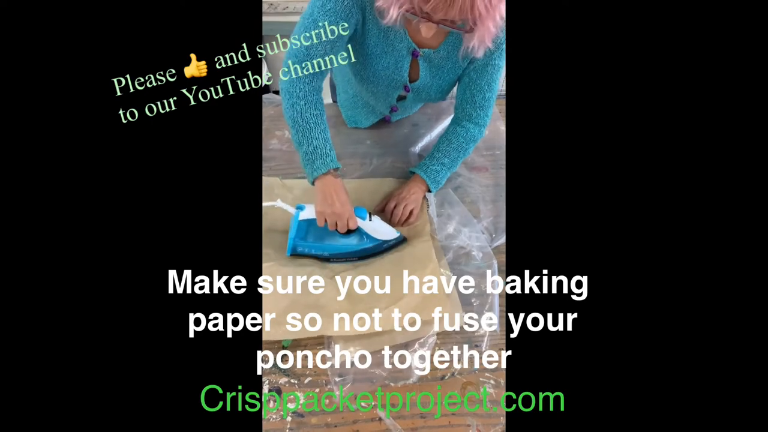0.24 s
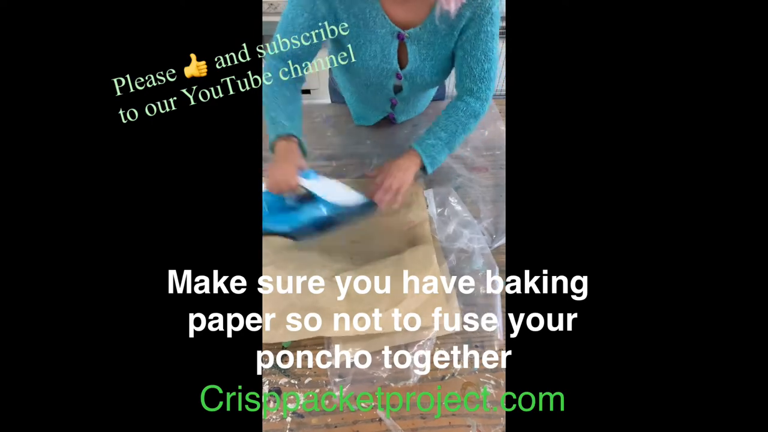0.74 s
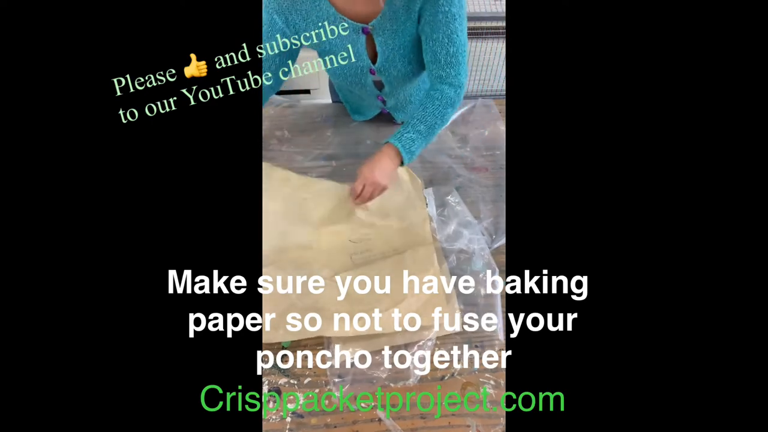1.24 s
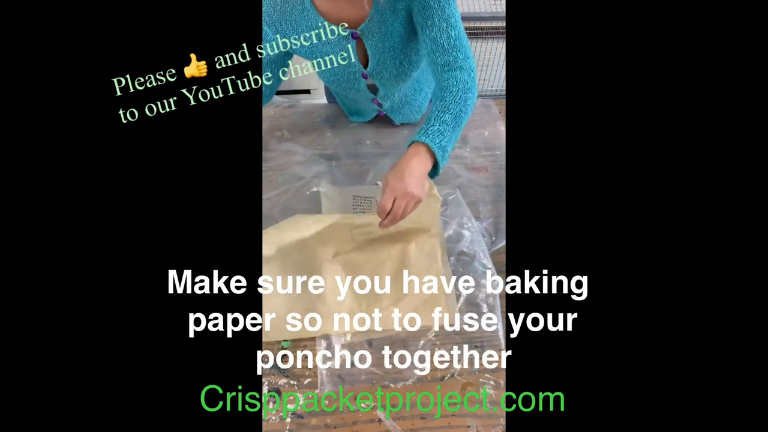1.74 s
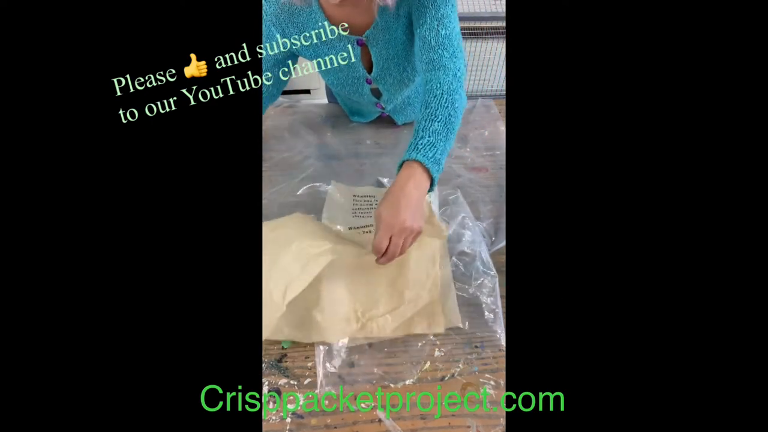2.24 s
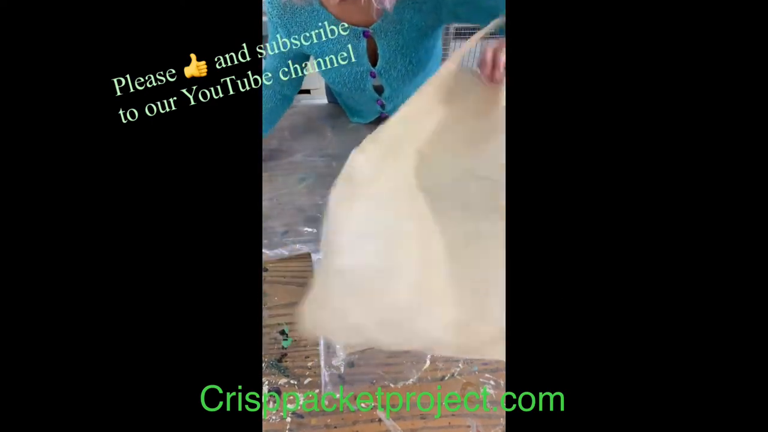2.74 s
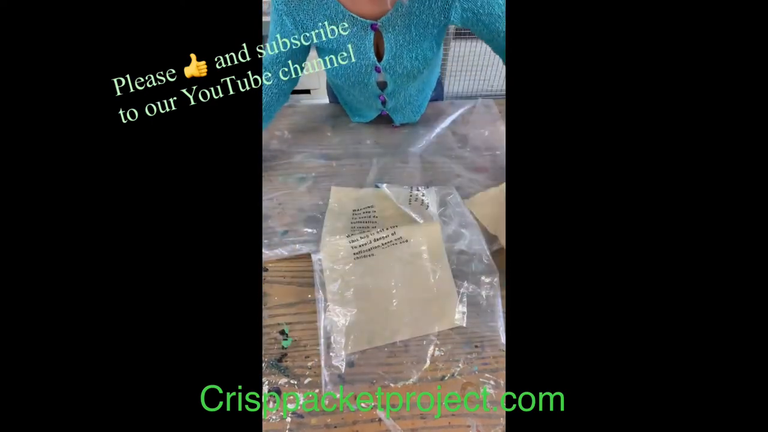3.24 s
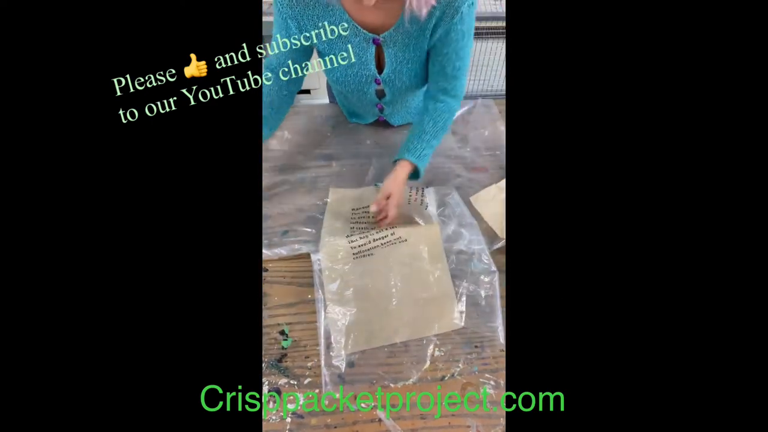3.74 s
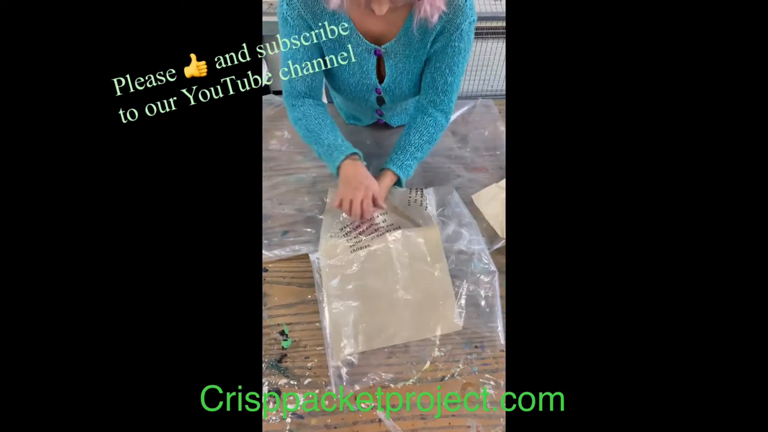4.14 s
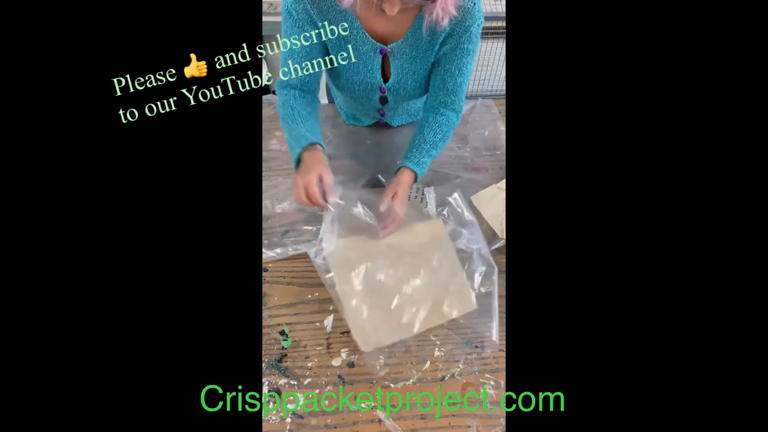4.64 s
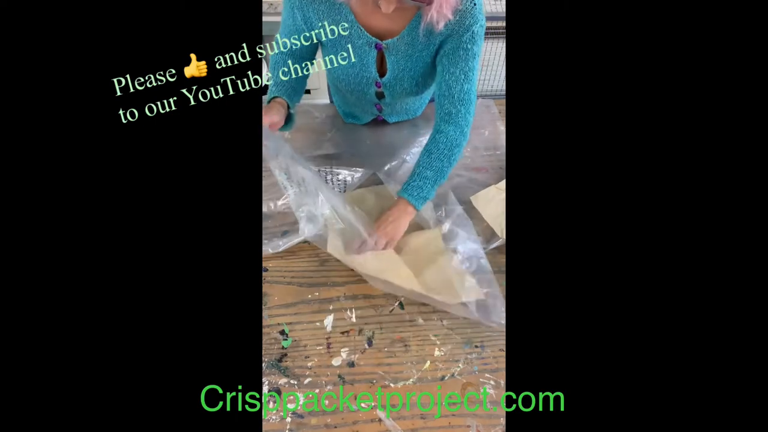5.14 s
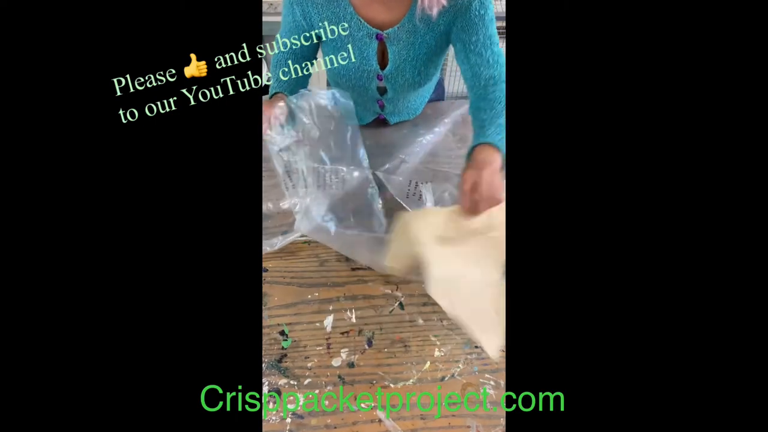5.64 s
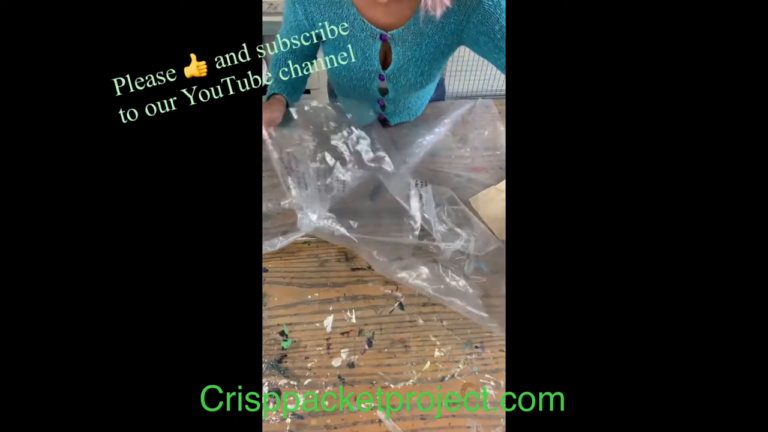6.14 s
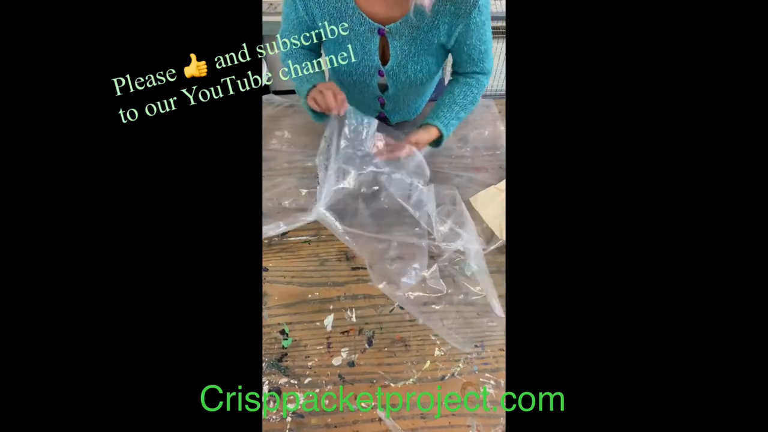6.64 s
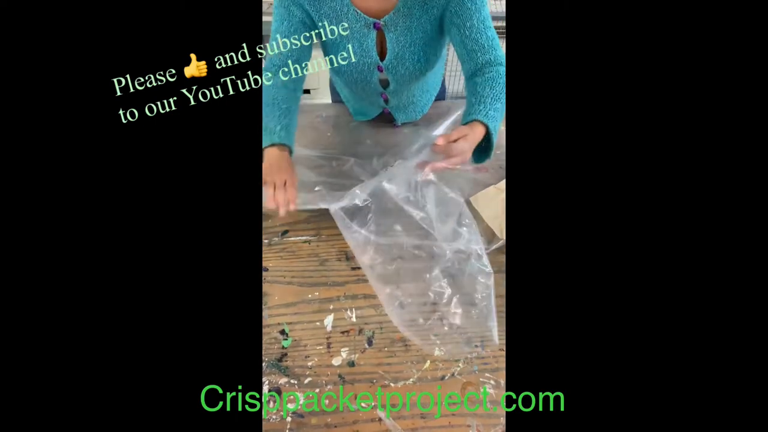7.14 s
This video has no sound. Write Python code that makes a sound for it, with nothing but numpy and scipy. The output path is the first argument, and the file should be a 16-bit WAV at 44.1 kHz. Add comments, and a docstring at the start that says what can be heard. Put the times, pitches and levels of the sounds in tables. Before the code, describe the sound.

Baking paper crackles close to the microphone under an iron, with a sharp cluster of snaps at the start and softer crinkling until about 1 second. The paper then slides off a plastic bag in a hissing rustle until 2.5 seconds. Over this, between 1.4 and 1.8 seconds, the iron is set down on a wooden table with three thuds and short plastic clacks. From 2.5 to 3.7 seconds the lifted paper crackles crisply in the air. Fingers part the plastic bag with quieter crinkles and little pops until 4.9 seconds. Paper is pulled out of it in a louder rustle, peaking around 5.5 seconds with a soft bump. The bag is shaken with bright snaps, then smoothed from 6.7 seconds to the end at 7.4 with duller crinkles and pops. A faint appliance hum and low air rumble lie underneath in the small room.

```python
"""Baking paper crackles under an iron, close up, then is drawn off a plastic bag and lifted away.
The iron is set down on the wooden table with three thuds; the bag is opened, shaken out and smoothed.
Both sheets sound by buckling: swarms of tiny snaps over a sliding hiss, with loud creases popping through.
Behind them a small room hums faintly. A microphone with two closely spaced ports hears it all."""
import sys
import numpy as np
from scipy import signal
from scipy.fft import rfft, irfft, next_fast_len
from scipy.io import wavfile
from scipy.ndimage import uniform_filter1d, map_coordinates

SR = 44100
rng = np.random.default_rng(int(sys.argv[2]) if len(sys.argv) > 2 else 0)


def store_wav(level_fs):
    """Save 16-bit WAV to argv[1]."""
    pcm = np.round(np.clip(np.atleast_2d(level_fs), -1, 1) * 32767)
    wavfile.write(sys.argv[1], SR, pcm.T.astype(np.int16))


N = 326340

# The paper's colour at close range in each gesture: frequency_hz, relative_db
PAPER_IRONED = [(70, -22), (250, -7), (450, -10), (700, -3), (1050, 1), (1450, -1), (2300, -9), (3200, -10),
                (6000, -10), (9500, -14), (15000, -19)]
PAPER_DRAWN = [(70, -22), (250, -7), (450, -2), (700, -2), (1000, -1.5), (1450, 0.5), (2100, -2),
               (3200, -2.5), (6000, -7), (9500, -9), (15000, -15)]
PAPER_DRAGGED = [(70, -20), (250, -2), (450, 0), (700, 0), (1000, -1), (1450, 0), (2100, -5), (3200, -6),
                 (6000, -8), (9500, -8.5), (15000, -12.5)]
PAPER_LIFTED = [(70, -22), (250, -3), (450, -3), (700, -4), (1000, -3), (1450, -2), (2100, -3), (3200, -6),
                (6000, -8), (9500, -9), (15000, -11)]
def baking_paper():
    """Just in front of the microphone, paper shifts under the iron, slides off and crackles in the air."""
    sliding = dict(snaps_per_s=2800, spread_db=1.5, clump_db=1.5, hiss=0.45,
                   flex_db=1.5, jerk_db=.7, fold_db=2)
    return (rustle("ironing", PAPER_IRONED, snaps_per_s=1400, spread_db=6, clump_db=0.5, hiss=0.45,
                   flex_db=0.5, tick_db=-0.5, jerk_db=.7, fold_db=3)
            + rustle("drawing", PAPER_DRAWN, tick_db=0.6, **sliding)
            + rustle("dragging", PAPER_DRAGGED, tick_db=0.8, **sliding)
            + rustle("lifting", PAPER_LIFTED, snaps_per_s=900, spread_db=5.5, clump_db=3, hiss=0.26,
                     flex_db=0, tick_db=-0.8, jerk_db=.8, fold_db=3.5))


# The bag's colour, bright hanging free and dull under the palms: frequency_hz, relative_db
BAG_OPENED = [(70, -22), (250, -5), (450, -3), (700, 0), (1000, -1), (1450, 0), (2100, -5), (3200, -7),
              (6000, -11), (9500, -15), (15000, -23)]
BAG_EMPTIED = [(70, -22), (250, -9), (450, -5), (700, -1), (1000, -1), (1450, 0), (2100, -3), (3200, -5),
               (6000, -8), (9500, -9), (15000, -15)]
BAG_SHAKEN = [(70, -22), (250, -3), (450, -3), (700, -1), (1000, -1), (1450, 0), (2100, -2), (3200, -4),
              (6000, -5), (9500, -5), (15000, -12)]
BAG_SMOOTHED = [(70, -22), (250, -4), (450, -2), (700, -3), (1000, -2), (1450, 0), (2100, -5.5),
                (3200, -9.5), (6000, -15), (9500, -19), (15000, -28)]
def plastic_bag():
    """At the same spot, fingers part the bag, pull the inner paper out, shake the film and press it flat."""
    return (rustle("opening", BAG_OPENED, snaps_per_s=700, spread_db=5, clump_db=4, hiss=0.4,
                   flex_db=-0.3, tick_db=-0.3, jerk_db=.8, fold_db=4)
            + rustle("emptying", BAG_EMPTIED, snaps_per_s=800, spread_db=4, clump_db=3.5, hiss=0.28,
                     flex_db=-0.6, tick_db=-0.3, jerk_db=.7, fold_db=3.5)
            + rustle("shaking", BAG_SHAKEN, snaps_per_s=1300, spread_db=5.5, clump_db=1.5, hiss=0.35,
                     flex_db=-1, tick_db=0, jerk_db=.7, fold_db=3)
            + rustle("smoothing", BAG_SMOOTHED, snaps_per_s=1200, spread_db=4, clump_db=2.5, hiss=0.35,
                     flex_db=0, tick_db=-3, jerk_db=.8, fold_db=4))


SPLIT_HZ = 3800  # a sheet flexes below this and ticks above it
# What the hands are doing, by gesture name: start_s, end_s
GESTURES = {"ironing": (0, 1.03), "drawing": (1.03, 2.05), "dragging": (2.05, 2.53),
            "lifting": (2.53, 3.75), "opening": (3.75, 4.88), "emptying": (4.88, 5.68),
            "shaking": (5.68, 6.7), "smoothing": (6.7, 7.4)}
# Each push or pull on a sheet: peak_s, rise_s, hold_s, flex_db, tick_over_flex_db
HAND_STROKES = [(0.006, 0.095, .02, -54, -14), (0.111, 0.11, 0.0061, -42, -1.5),
                (0.208, 0.038, 0.06, -53, -3), (0.388, 0.079, 0.018, -44, -1.5),
                (0.49, 0.049, 0.037, -53, -5), (0.64, 0.027, 0.073, -53.5, -7),
                (0.953, 0.024, 0.022, -57, -21), (1.086, 0.064, 0.047, -56, 3.5),
                (1.264, 0.14, 0.2, -37, -0.5), (1.314, .04, 0.017, -40.5, -4),
                (1.39, 0.064, 0.14, -43.5, -2.5), (1.522, 0.078, 0.25, -44.5, -0.5),
                (1.841, 0.016, 0.023, -50.5, 2.5), (2.136, 0.086, 0.041, -43.5, 0),
                (2.24, 0.15, 0.067, -44, 1), (2.386, 0.066, 0.024, -61, 5.5), (2.457, .05, 0.17, -66, -26),
                (2.628, 0.067, 0.012, -43, -4), (2.664, .015, 0.017, -44.5, -1),
                (2.723, 0.021, 0.015, -46, -3), (2.846, 0.069, 0.063, -52.5, -1.5),
                (2.982, 0.025, 0.043, -45, -1), (3.08, 0.022, 0.011, -54.5, 5),
                (3.191, 0.056, 0.017, -51.5, -0.5), (3.287, 0.051, 0.073, -49, -0.5),
                (3.411, 0.077, 0.16, -52, 0.5), (3.418, 0.036, 0.0097, -54, 9.5),
                (3.664, 0.042, 0.0089, -51.5, -8.5), (3.783, 0.097, 0.038, -53.5, -12),
                (3.858, 0.09, 0.065, -51, -2), (4.15, 0.14, 0.13, -56.5, -4),
                (4.472, 0.16, 0.023, -61.5, -8), (4.526, 0.025, 0.15, -51, -7.5),
                (4.695, 0.044, 0.021, -44, -4), (4.78, .04, 0.17, -56.5, -3),
                (4.923, 0.042, 0.15, -42, -4.5), (5.102, 0.05, 0.083, -45.5, -1),
                (5.196, 0.11, 0.037, -35.5, -2.5), (5.344, 0.19, 0.032, -42.5, 3.5),
                (5.41, .06, 0.035, -49, 2), (5.464, 0.067, 0.051, -35.5, -1.5),
                (5.602, 0.18, 0.021, -34.5, -2), (5.706, .05, 0.16, -48, -1),
                (5.874, 0.037, 0.13, -43.5, -3), (6.25, 0.1, 0.038, -60, 4),
                (6.304, 0.047, 0.021, -53, 6.5), (6.428, 0.13, 0.027, -53, 1),
                (6.519, 0.12, 0.051, -56.5, 8.5), (6.606, 0.066, 0.042, -54, -1.5),
                (6.731, 0.01, 0.039, -47.5, -5), (6.797, 0.06, 0.022, -43.5, -6.5),
                (6.871, 0.044, 0.097, -44, -5.5), (7.032, 0.012, 0.024, -47, -6.5),
                (7.257, 0.081, 0.089, -53.5, -7), (7.352, 0.045, 0.01, -49, -1)]
# The rustle's top treble is softened above 10 kHz: frequency_hz, gain_db
TREBLE_ROLLOFF = [(10000, 0), (16000, -4.5)]
def rustle(gesture, colour, snaps_per_s, spread_db, clump_db, hiss, flex_db, tick_db, jerk_db, fold_db):
    """A handled sheet buckles in clumps of tiny snaps; each flexes the sheet and ticks in the treble."""
    start, end = GESTURES[gesture]
    overlap_s = .25  # one gesture rings on into the next
    t = np.arange(round(max(start - overlap_s, 0) * SR), round((end + overlap_s) * SR)) / SR
    size = len(t)
    flex, tick = effort([row for row in HAND_STROKES if start <= row[0] < end], t)
    strength = amp(spread_db * np.minimum(rng.standard_normal(size), 2) + clump_db * wobble(109.2, size))
    snaps = (rng.random(size) < snaps_per_s / SR) * strength ** 2
    # the lower power makes ticks more even in size than the flexing
    flexing = amp(flex_db) * flex * swarm(snaps ** 0.87, life_s=0.002, hiss=hiss)
    ticking = amp(tick_db) * tick * swarm(snaps ** 0.75, life_s=0.00047, hiss=hiss)
    sheet = coloured(flexing, band(colour, -1.27))
    sheet += coloured(ticking, lambda hz: band(colour, 1)(hz) + along(TREBLE_ROLLOFF, hz))
    jerks = amp(jerk_db * wobble(39, size))  # the sheet gives way unevenly
    out = np.zeros(N)
    add(out, t[0], jerks * folding(sheet, fold_db))
    return out


def effort(strokes, t, rise_db=20, sag_db_per_s=23.5, release_db_per_s=173):
    """Flexing and ticking gains at times t: each stroke swells, sags while held and settles."""
    flex_power, tick_power = np.zeros((2, len(t)))
    for peak_s, rise_s, hold_s, flex_db, tick_over_flex_db in strokes:
        age = t - peak_s
        shape_db = (rise_db * np.minimum(age, 0) / rise_s
                    - sag_db_per_s * np.clip(age, 0, hold_s)
                    - release_db_per_s * np.maximum(age - hold_s, 0))
        flex_power += amp(flex_db + shape_db) ** 2
        tick_power += amp(flex_db + tick_over_flex_db + 1.37 * shape_db) ** 2  # swells and dies faster
    return np.sqrt(flex_power), np.sqrt(tick_power)


def swarm(snaps, life_s, hiss):
    """Each snap's energy dies away over life_s; sliding adds an even share of hiss."""
    energy = signal.lfilter([1], [1, -np.exp(-1 / (life_s * SR))], snaps)
    energy /= np.abs(uniform_filter1d(energy, size=SR // 32)) + 1e-9
    return np.sqrt(hiss + (1 - hiss) * energy) * rng.standard_normal(len(snaps))


def folding(x, depth_db):
    """Facets of the sheet grow and shrink, so its upper resonances come and go."""
    hz, _, spectrum = signal.stft(x, SR, nperseg=512)
    facets = uniform_filter1d(rng.standard_normal(spectrum.shape), size=5, axis=0)
    facets = uniform_filter1d(facets, size=5, axis=1)
    swing_db = depth_db * hz[:, None] / (hz[:, None] + SPLIT_HZ / 2)
    return signal.istft(spectrum * amp(swing_db * unit(facets)), nperseg=512)[1][:len(x)]


def band(colour, side):
    """A colour's flexing part (side < 0) or ticking part (side > 0); a larger side cuts more steeply."""
    return lambda hz: along(colour, hz) - 10 * np.log10(1 + ((hz + 100) / SPLIT_HZ) ** (-6 * side))


# Single creases that stand out of the rustle: start_s, tick_db, flex_db
LOUD_CREASES = [(0.0345, -51, -42.5), (0.109, -41, -37.5), (0.123, -40, -40), (0.1438, -37.5, -44),
                (0.2719, -61, -60), (0.3175, -68, -53), (0.454, -57, -47.5), (0.4744, -69, -48),
                (0.5393, -54.5, -57), (0.6595, -56, -53), (0.6793, -53, -65), (0.784, -62, -59),
                (1.0373, -48.5, -52.5), (1.0456, -47.5, -54), (1.085, -41, -44), (1.1269, -51, -47),
                (1.229, -36.5, -38), (1.332, -32, -32), (1.5974, -49, -43), (1.6205, -42, -44),
                (1.651, -42.5, -44), (1.6647, -43, -39.5), (1.6824, -44, -42), (1.6896, -43, -38),
                (1.772, -46, -41), (1.8275, -45, -50), (1.8523, -46, -46), (1.881, -45, -42),
                (2.006, -53, -47.5), (2.449, -71, -55.5), (2.533, -72, -59), (2.5567, -50.5, -52),
                (2.5997, -41, -45), (2.6438, -36.5, -36.5), (2.7417, -47, -44), (2.763, -43.5, -59),
                (2.7772, -56, -53), (2.835, -43, -47), (2.864, -38, -44), (2.9088, -50, -45),
                (2.9734, -39, -55), (2.994, -41, -47), (3.034, -32.5, -43), (3.058, -37, -46.5),
                (3.0895, -48, -47.5), (3.1428, -41.5, -56), (3.166, -51.5, -58), (3.187, -54, -67),
                (3.252, -47, -50), (3.426, -37, -49), (3.4931, -52, -51), (3.5296, -42.5, -54),
                (3.5818, -59, -47), (3.8177, -58, -50.5), (3.859, -49, -42), (3.867, -47, -41.5),
                (3.918, -46.5, -64), (3.926, -52, -46.5), (4.1634, -52, -48.5), (4.198, -45.5, -51),
                (4.2171, -49, -46), (4.2649, -60, -48), (4.288, -64, -47.5), (4.3093, -74, -57),
                (4.446, -62, -54), (4.514, -62, -48.5), (4.557, -67, -54), (4.5952, -54, -51),
                (4.6873, -45, -43), (4.8098, -42.5, -41.5), (4.862, -45.5, -46), (4.9198, -54, -36.5),
                (4.9294, -45, -39), (4.9482, -46, -45), (5.041, -36.5, -42), (5.049, -38.5, -62),
                (5.1, -37, -38), (5.1138, -46, -45), (5.221, -38, -37), (5.2835, -46, -41),
                (5.3364, -40, -41), (5.4012, -39, -36.5), (5.488, -46, -30), (5.507, -48, -39),
                (5.515, -47, -31), (5.575, -50, -29), (5.643, -32, -39), (5.691, -38, -50),
                (5.73, -48, -37.5), (5.8001, -38, -42.5), (5.833, -40.5, -54), (6.113, -50.5, -54),
                (6.2223, -47.5, -55.5), (6.271, -39, -60), (6.3224, -42, -47.5), (6.356, -58, -47),
                (6.607, -44, -54), (6.614, -56, -50.5), (6.7349, -48, -39), (6.7641, -47, -36.5),
                (6.77, -58, -43), (6.848, -45, -39.5), (6.9071, -48, -38), (6.9173, -50, -50),
                (6.9307, -57, -51), (6.9627, -52, -46), (7.099, -51, -50), (7.2366, -61, -48.5),
                (7.2423, -66, -52), (7.2906, -55, -50), (7.3112, -58, -47), (7.3462, -51, -46),
                (7.3543, -54, -53)]
# Gestures in which the sheet is loose enough to throw lesser creases: gesture_name
LOOSE_GESTURES = ["ironing", "lifting", "opening", "shaking"]
def creases(stray_slots=60, stray_db=-12, spread_db=2):
    """The loud single snaps of both sheets, and lesser ones at random that follow the hand's effort."""
    times = (np.arange(stray_slots) + rng.random(stray_slots)) / stray_slots * N / SR
    scatter = amp(stray_db + spread_db * rng.standard_normal((stray_slots, 2))).T
    flexes, ticks = effort(HAND_STROKES, times) * scatter
    loose_spans = [GESTURES[name] for name in LOOSE_GESTURES]
    lesser = [(start_s, tick, flex) for start_s, tick, flex in zip(times, ticks, flexes)
              if any(begin <= start_s < end for begin, end in loose_spans)]
    loud = [(start_s, amp(tick_db), amp(flex_db)) for start_s, tick_db, flex_db in LOUD_CREASES]
    out = np.zeros(N)
    for start_s, tick, flex in loud + lesser:
        add(out, start_s, tick * crease_flip(side=1, life_s=.0007, ring_db=-10, ring_s=.002))
        add(out, start_s, flex * crease_flip(side=-1, life_s=.0016, ring_db=-8, ring_s=.003))
    return out


# A crease's colour at close range: frequency_hz, relative_db
CREASE_COLOUR = [(70, -28), (300, -11), (700, -4), (1450, 0), (2200, -3), (3200, -5), (6000, -4),
                 (8500, -1), (16000, -5.5)]
def crease_flip(side, life_s, ring_db, ring_s):
    """A crease flips at once and the sheet around it shivers briefly."""
    t = np.arange(SR // 40) / SR
    envelope = np.exp(-t / life_s) + amp(ring_db) * np.exp(-t / ring_s)
    burst = envelope * rng.choice([-1, 1], len(t))
    return unit_burst(coloured(burst, band(CREASE_COLOUR, side)))


# Folds giving way: start_s, length_s, level_db
FOLD_RUNS = [(0.051, 0.0024, -48), (0.116, .012, -53), (0.286, .006, -70), (0.45, .005, -50),
             (0.65, .003, -63), (2.627, .006, -40), (2.645, 0.0025, -34), (2.653, .001, -41),
             (2.967, 0.0038, -44), (2.982, 0.0044, -38.5), (3.011, .007, -49), (3.032, .003, -54),
             (3.048, .002, -44), (3.097, .007, -54), (4.138, .004, -68), (4.244, 0.0026, -51),
             (4.452, 0.0032, -72), (4.927, .004, -47), (5.11, .005, -47), (5.159, 0.011, -36.5),
             (5.279, .004, -47), (5.35, 0.011, -36.5), (5.456, 0.0028, -40), (5.636, 0.0047, -34),
             (5.724, .008, -40.5), (5.806, 0.0029, -44), (5.869, 0.0015, -40), (5.878, .005, -42),
             (5.888, 0.0043, -35.5), (5.897, .006, -33), (5.926, .006, -40), (5.942, .009, -33),
             (6.012, 0.0038, -41), (6.31, 0.0044, -44)]
def fold_runs(count=6, spread_db=1.5, life_s=.0005):
    """A handful of bright, unevenly spaced snaps runs along one fold."""
    out, t = np.zeros(N), np.arange(SR // 40) / SR
    for start_s, length_s, level_db in FOLD_RUNS:
        onsets = (np.arange(count) + rng.random(count)) / count * length_s
        age = t - onsets[:, None]
        snaps = np.exp(-np.abs(age) / life_s) * (age >= 0)
        envelope = amp(spread_db * rng.standard_normal(count)) @ snaps
        run = coloured(envelope * rng.choice([-1, 1], len(t)), band(CREASE_COLOUR, 1))
        add(out, start_s, amp(level_db) * unit_burst(run))
    return out


# A sheet pops over under a fingertip: start_s, level_db, pitch_hz
FINGER_POPS = [(0.109, -37.5, 1155), (0.2095, -50.5, 1210), (5.51, -31.5, 1300), (4.1015, -54.5, 1420),
               (4.156, -55, 1440), (4.198, -56, 1170), (4.225, -44.5, 1380), (4.2643, -42.5, 1390),
               (4.288, -46.5, 1680), (4.405, -57, 1490), (4.4494, -68, 1210), (6.7345, -43, 2440),
               (6.7452, -51, 1340), (6.8052, -38.5, 1510), (6.849, -42, 1490), (6.871, -39, 1220),
               (6.8964, -40, 800), (6.9216, -42, 1510), (6.9284, -43, 1480), (6.9634, -42, 1200),
               (7.053, -50, 745)]
# Modes of the popped dome: pitch_ratio, relative_db
DOME_MODES = [(1, 0), (1.42, -5), (2.1, -11)]
def finger_pops(t60_s=.019, attack_s=.0011):
    """A small dome of film flips and rings in a few quickly damped modes."""
    out, t = np.zeros(N), np.arange(SR // 30) / SR
    for start_s, level_db, pitch_hz in FINGER_POPS:
        ring = np.zeros(len(t))
        for ratio, mode_db in DOME_MODES:
            mode_hz = pitch_hz * ratio * (1 + 0.067 * rng.standard_normal())
            decay = amp(mode_db - 60 * t * ratio / t60_s)
            ring += decay * np.sin(2 * np.pi * (mode_hz * t + rng.random()))
        ring *= 1 - np.exp(-t / attack_s)
        add(out, start_s, amp(level_db) * unit_burst(ring))
    return out


# The iron lands and rocks, the lifted paper flaps, hands bump the table: start_s, force_db, cutoff_hz
THUMPS = [(0.773, -45.5, 85), (1.367, -24, 150), (1.429, -24, 70), (1.514, -28, 190), (1.743, -20, 613),
          (1.774, -37.5, 710), (2.822, -42, 350), (2.889, -56, 306), (3.851, -51, 390), (5.546, -37.5, 149)]
# Low modes of the wooden table, plus the long, faint ring of the iron's soleplate:
# pitch_hz, relative_db, t60_s
WOOD_AND_SOLEPLATE_MODES = [(58, -7, 0.65), (89.3, -5.5, 0.32), (106.6, -7.5, 0.25), (135, -0.9, 0.34),
                            (182.4, -13, 0.75), (202.4, -8, 0.63), (236, 2, 0.1), (356, -2.5, 0.2),
                            (396, -10.5, 0.29), (440, -3, 0.24), (514, -7, 0.18), (647, -14, 0.11),
                            (996, -27.5, 5), (1090, -39, 4.2)]
# Colour of the thud beneath the modes: frequency_hz, relative_db
THUD_COLOUR = [(30, -24), (55, -5), (95, 1.5), (150, -6), (210, -11), (290, -15.5), (430, -16.5),
               (600, -20.5), (1200, -7), (4000, -24)]
# How long the thud lasts: frequency_hz, t60_s
THUD_DECAY = [(60, 0.43), (130, 0.89), (220, 0.75), (500, 0.98), (2000, 0.62)]
def low_thumps():
    """Each thump is a dense thud under wood and soleplate modes; a soft contact leaves only the low ones."""
    out, t = np.zeros(N), np.arange(SR) / SR
    for start_s, force_db, cutoff_hz in THUMPS:
        blow = np.zeros(len(t))
        for k, (pitch_hz, mode_db, t60_s) in enumerate(WOOD_AND_SOLEPLATE_MODES):
            swell = 1 - np.exp(-t * pitch_hz / 1.05)  # low modes take longer to build up
            decay = amp(mode_db - 3.5 + rng.normal(0, 1) - 60 * t / t60_s)
            blow += (-1) ** k * decay * swell * np.sin(2 * np.pi * pitch_hz * t)
        thud = coloured(dying_noise(THUD_DECAY), lambda hz: along(THUD_COLOUR, hz))
        add(blow, 0, amp(-7.5) * thud)
        add(out, start_s, amp(force_db) * filtered(blow, lambda hz: 1 / (1 + 1j * hz / cutoff_hz)))
    return out


# The iron tips onto its heel: start_s, level_db
IRON_CLACKS = [(1.3688, -32), (1.3958, -32.5), (1.516, -36), (1.773, -35)]
# Colour of its housing: frequency_hz, relative_db
HOUSING_COLOUR = [(150, -20), (400, -9), (750, 2), (1000, 4), (1400, -2), (2000, -11), (3000, -15),
                  (6000, -15), (16000, -40)]
def iron_clacks(t60_s=0.025):
    """The iron's plastic housing gives a short, hard rattle."""
    out, t = np.zeros(N), np.arange(SR // 20) / SR
    for start_s, level_db in IRON_CLACKS:
        rattle = rng.standard_normal(len(t)) * amp(-60 * t / t60_s)
        clack = coloured(rattle, lambda hz: along(HOUSING_COLOUR, hz))
        add(out, start_s, amp(level_db) * unit_burst(clack))
    return out


def room(x):
    """The sheets move, so every fifth of a second has its own reflections."""
    out, hop = np.zeros((2, N)), SR // 5
    for start in range(0, N, hop):
        for port, taps in zip(out, reflections()):
            add(port, start / SR, signal.fftconvolve(x[start:start + hop], taps))
    return out


# The small room's tail: frequency_hz, t60_s
ROOM_DECAY = [(100, 0.38), (500, 0.66), (2000, 0.01), (8000, 0.0091), (16000, 0.054)]
def reflections(table_db=-16, table_life_s=.003, walls_db=-6.5, walls_life_s=.008, tail_db=-16):
    """The table top echoes from the sheet's own direction; dull walls and the tail come from all around."""
    t = np.arange(SR // 2) / SR
    at_level = lambda x, db: amp(db) * x / np.linalg.norm(x)
    echoes = lambda life_s: rng.standard_normal(len(t)) * np.exp(-t / life_s) * (t > .001)
    dull = signal.butter(1, 4500, fs=SR)
    around = np.zeros((2, len(t)))
    for field in around:
        field += signal.lfilter(*dull, at_level(echoes(walls_life_s), walls_db))
        field += at_level(dying_noise(ROOM_DECAY) * (t > .005), tail_db)
    width = lambda hz: np.arccos(np.exp(-(hz / 300) ** 2)) / 2  # long waves reach both ports alike
    mid, side = filtered(around, lambda hz: np.array([np.cos(width(hz)), np.sin(width(hz))]))
    return direct(at_level(echoes(table_life_s), table_db)) + [mid + side, mid - side]


# Low rumble that swells as the waved sheets push air at the microphone: time_s, level_db
RUMBLE_LEVEL = [(0.0, -41), (0.15, -60), (2.6, -58), (3.5, -53), (4.7, -62.5), (5.4, -60), (6.0, -51),
                (6.75, -55), (7.4, -52)]
# Colours of the rumble and of the still air: frequency_hz, relative_db
RUMBLE_COLOUR = [(20, -54), (38, -10.5), (55, 6.5), (80, 0), (120, -12), (200, -15.5), (500, -77.5)]
AIR_COLOUR = [(30, -21), (120, 4), (270, 1), (420, -11.5), (650, -8), (1100, -7.5), (1600, -11.5),
              (2200, -20.5), (5000, -17.5), (9000, -36.5), (16000, -57)]
# An appliance in the background: pitch_hz, relative_db
HUM_TONES = [(59.2, -57), (274.5, -62.5), (624.5, -67)]
def background():
    """Pushed air rumbles at the microphone, over still room air and a wavering appliance hum."""
    t = np.arange(N) / SR
    rumble = coloured(rng.standard_normal(N), lambda hz: along(RUMBLE_COLOUR, hz))
    rumble *= amp(np.interp(t, *np.transpose(RUMBLE_LEVEL)))
    air = amp(-60) * coloured(rng.standard_normal(N), lambda hz: along(AIR_COLOUR, hz))
    hum = sum(amp(db - 5) * np.sin(2 * np.pi * hz * (t + 0.0011 * wobble(9, N))) for hz, db in HUM_TONES)
    return rumble + air + hum


# Delay across the microphone: frequency_hz, left_lag_s
PORT_LAG = [(500, 1.25e-4), (1300, .6e-4), (2400, .9e-4), (4400, 1.134e-4)]
def direct(x):
    """The sound reaches the right port just before the left."""
    return filtered(x, lambda hz: np.exp(1j * np.pi * hz * along(PORT_LAG, hz) * np.array([[-1], [1]])))


def amp(db):
    """Decibels to gain."""
    return 10 ** (np.asarray(db) / 20)


def unit(x):
    """Scaled to rms 1."""
    return x / np.sqrt(np.mean(x ** 2) + 1e-20)


def unit_burst(x):
    """Scaled to the energy of 5 ms at rms 1."""
    return x / np.linalg.norm(x) * np.sqrt(.005 * SR)


def along(points, hz):
    """(frequency_hz, value) points read on a log axis."""
    frequencies, values = np.transpose(points)
    return np.interp(np.log(hz + 1), np.log(frequencies + 1), values)


def add(track, start_s, x):
    """Mix x into track from start_s on."""
    start = max(round(start_s * SR), 0)
    part = track[start:start + len(x)]
    part += x[:len(part)]


def wobble(knots_per_s, size):
    """A smooth random curve."""
    knots = rng.standard_normal(int(size * knots_per_s / SR) + 4)
    return map_coordinates(knots, [np.arange(size) * knots_per_s / SR], order=2)


def filtered(x, response):
    """x through a response given as a function of frequency."""
    size = x.shape[-1]
    padded = 2 * next_fast_len(size // 2 + 4096)
    return irfft(rfft(x, padded) * response(np.fft.rfftfreq(padded, 1 / SR)), padded)[..., :size]


def coloured(x, level_db):
    """Causal colouring by a dB function of frequency; white noise keeps its power."""
    def response(hz):
        cepstrum = irfft(np.log(unit(amp(level_db(hz)))))
        cepstrum[1:len(hz) - 1] *= 2
        cepstrum[len(hz):] = 0
        return np.exp(rfft(cepstrum))
    return filtered(x, response)


def dying_noise(decay):
    """Half a second of noise, each frequency fading at its own speed."""
    hz, t, spectrum = signal.stft(rng.standard_normal(SR // 2), SR, nperseg=256)
    fade = amp(-60 * t / along(decay, hz)[:, None])
    return signal.istft(spectrum * fade, SR, nperseg=256)[1][:SR // 2]


def scene():
    """Sheets close in front, the iron a little louder on the left, the room around them."""
    sheets = baking_paper() + plastic_bag() + creases() + fold_runs() + finger_pops()
    knocks = low_thumps() + iron_clacks()
    lean_left = amp([[.5], [-.5]])
    return direct(sheets + background()) + direct(knocks) * lean_left + room(sheets + amp(-5) * knocks)


# Balance of the microphone's ports: frequency_hz, left_minus_right_db
PORT_BALANCE = [(60, 1.4), (150, 1.8), (350, 3), (700, 1), (1300, -1), (2400, -2), (4400, 0)]
def record(dry):
    """The microphone's two ports differ a little in colour, and the highest treble is cut off."""
    top_hz = 16300
    ports = filtered(dry, lambda hz: amp(along(PORT_BALANCE, hz) * np.array([[.5], [-.5]])))
    return filtered(ports, lambda hz: 1 / (1 + (hz / top_hz) ** 100))


dry = scene()
out = record(dry)
store_wav(out)
```